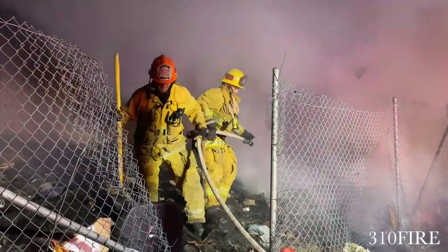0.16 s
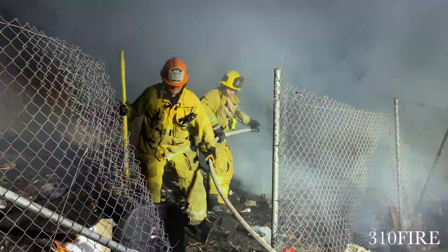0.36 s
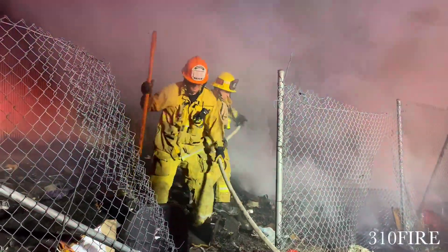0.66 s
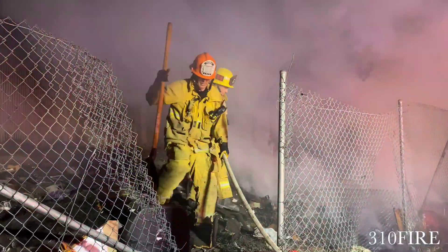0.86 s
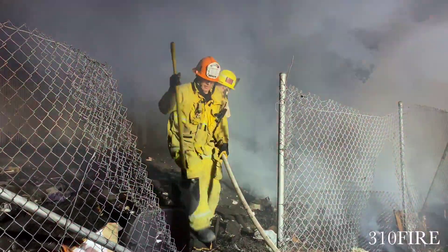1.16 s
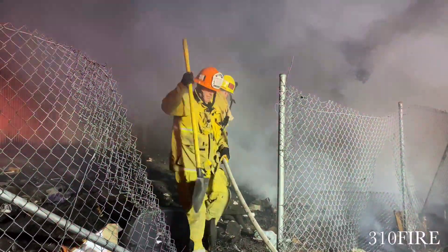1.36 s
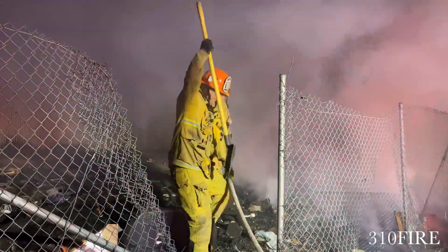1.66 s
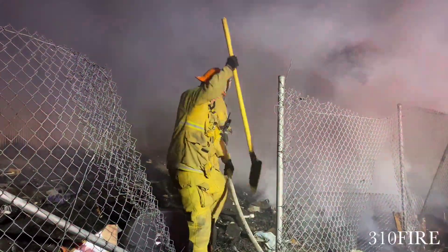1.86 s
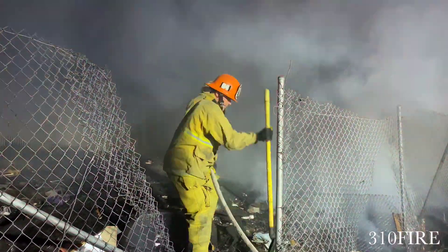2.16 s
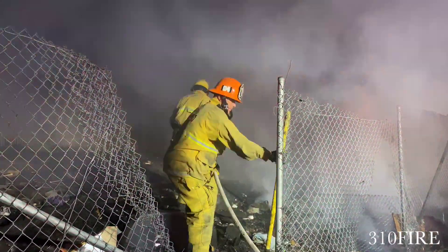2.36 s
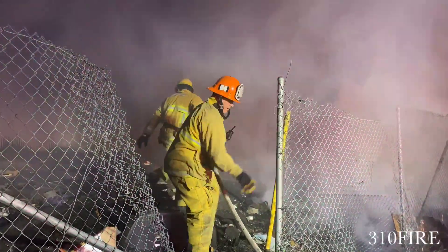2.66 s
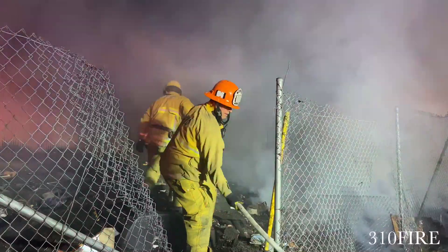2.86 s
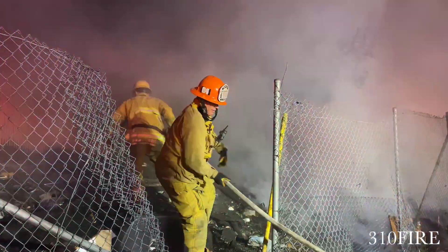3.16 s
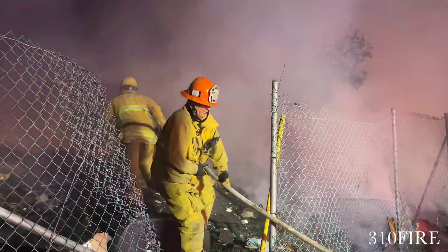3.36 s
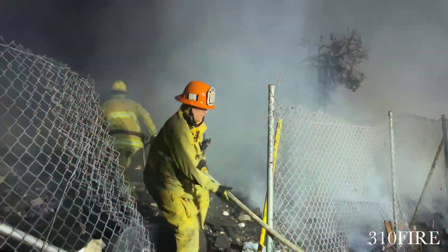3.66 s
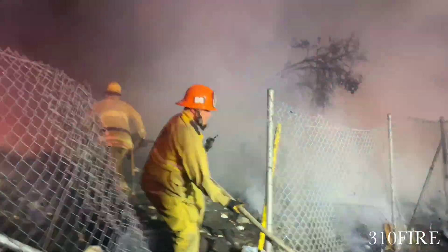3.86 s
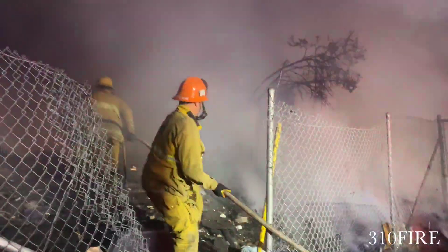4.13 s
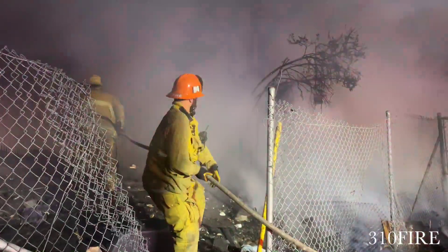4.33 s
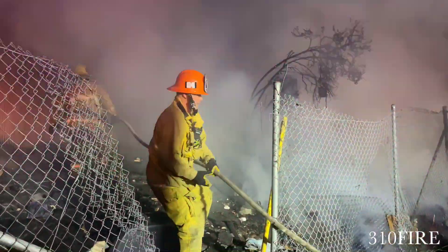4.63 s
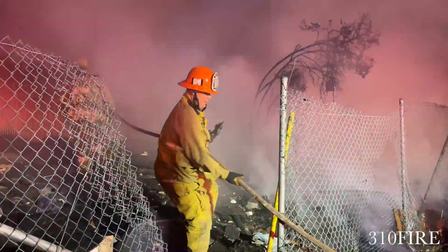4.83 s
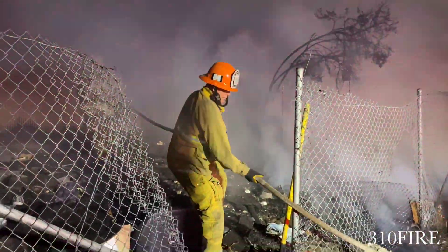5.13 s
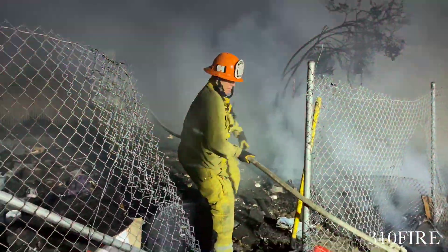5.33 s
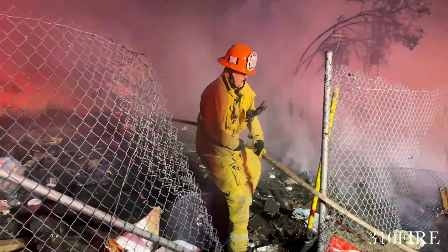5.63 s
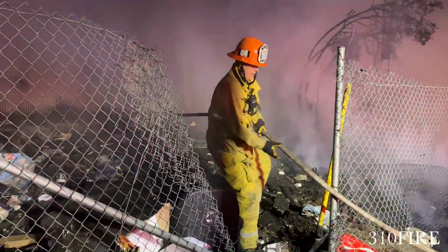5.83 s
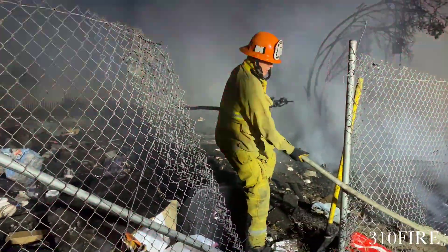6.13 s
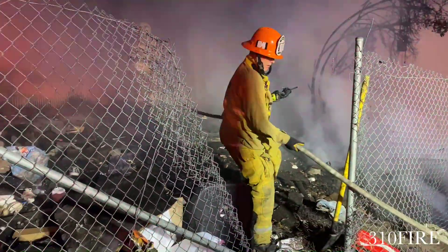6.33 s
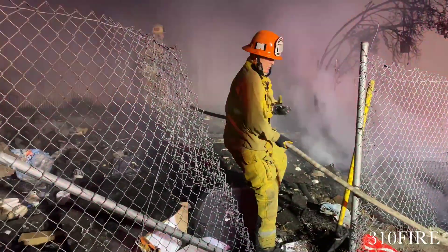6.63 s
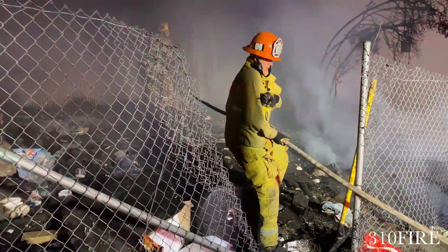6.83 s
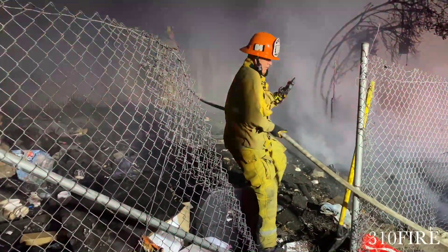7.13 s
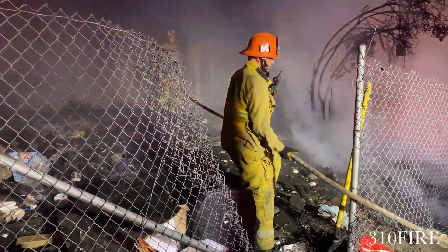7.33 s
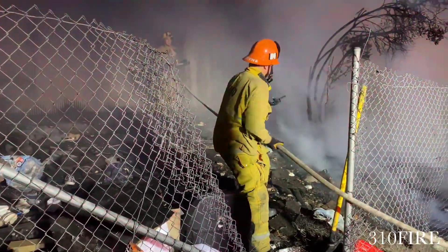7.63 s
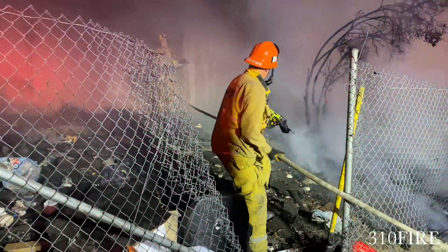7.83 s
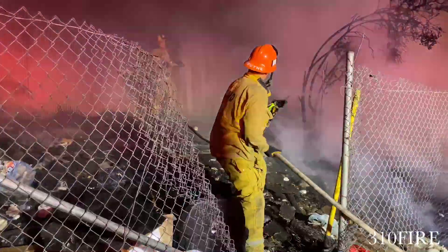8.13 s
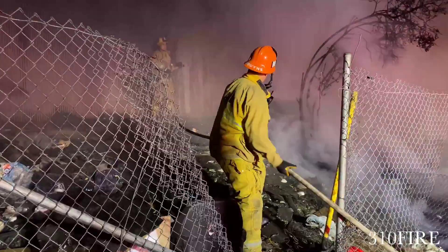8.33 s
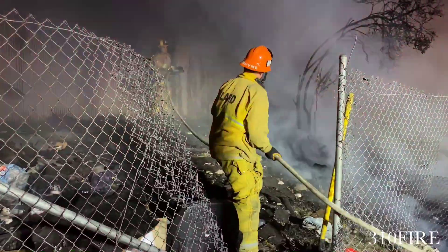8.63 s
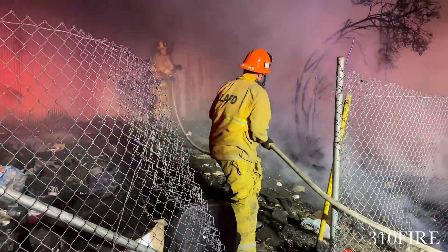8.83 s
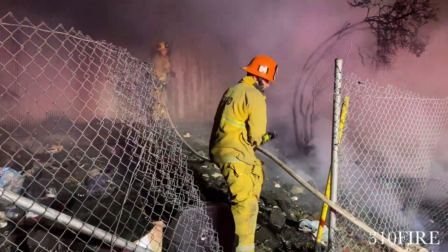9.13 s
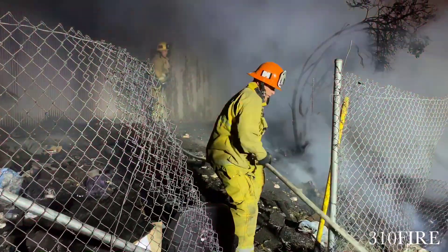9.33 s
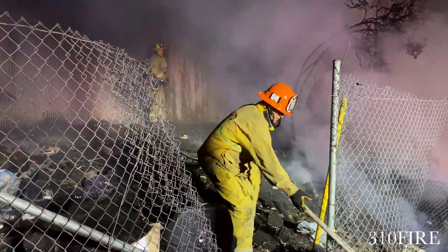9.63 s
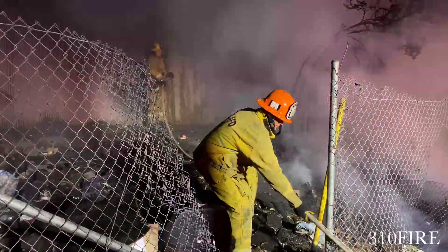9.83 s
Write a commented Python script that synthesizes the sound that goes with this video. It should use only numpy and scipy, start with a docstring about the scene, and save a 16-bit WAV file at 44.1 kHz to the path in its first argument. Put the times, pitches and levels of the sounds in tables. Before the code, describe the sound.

A fire truck's diesel engine drones while a chain-link fence jingles and ticks close by and a hose hisses farther off.

```python
"""Night, a microphone pair close to a chain-link fence. From the start a diesel pumper idles, a second
engine hunts up and down, its gears whining, and a hose sprays farther off. From 1 to 3 s a distant engine
slows and fades; just after 2 s a long tool is leaned on the mesh and scrapes down it. A hose dragging
past makes the fence jingle and tick, its links ringing most at 3 to 4 s. Toward the end the pump's
clatter and the spray grow louder."""
import sys
import numpy as np
from scipy import signal
from scipy.fft import rfft, irfft, next_fast_len
from scipy.io import wavfile
from scipy.ndimage import uniform_filter1d

SR = 44100
rng = np.random.default_rng(int(sys.argv[2]) if len(sys.argv) > 2 else 0)


def output_pcm(signal):
    """Save a mono or channel-first signal as 16-bit PCM at the path in sys.argv[1].

    Samples are clipped to [-1, 1] before scaling.
    """
    pcm = np.clip(np.atleast_2d(signal).T, -1, 1) * 32767
    wavfile.write(sys.argv[1], SR, np.round(pcm).astype(np.int16))


N = 440117
TIME = np.arange(N) / SR

# The pumper's idle. Each row: time in seconds, shaft turns a minute.
SHAFT_RPM = [(0, 839), (1.05, 830), (2, 839), (2.5, 839), (3.4, 835), (4.5, 839), (5.5, 837), (8, 840),
             (9.3, 841), (9.6, 845), (9.98, 857)]
# Exhaust tones, strongest at two pipe resonances. Each row: multiple of the shaft rate, level in dB.
EXHAUST_TONES = [(3, -39), (5, -39), (6, -39), (7, -46), (9, -45), (10, -42), (11, -38), (11.5, -41),
                 (12, -31), (13, -41), (14, -47), (15, -48), (16, -47), (17, -38), (18, -41), (18.5, -48),
                 (19, -26), (19.5, -44), (20, -28.5), (20.5, -48), (21, -40.5), (21.5, -46), (22, -47),
                 (24, -52), (27, -47), (29, -51), (30, -54)]
# Strength in dB of each of the six firings in two turns.
FIRING_DB = [1.5, -1, .6, -1.5, .3, -.6]
# The pumper at work. Each row: time in seconds, then pump clatter, hose spray and fan whirr in dB.
WORK_LEVELS = [(0, -41, -48, -40), (.5, -41.5, -46, -37.5), (1, -42.5, -46.5, -41.5),
               (2.2, -39.5, -46.5, -44.5), (3.6, -39.5, -44, -41), (4.3, -37.5, -44, -41),
               (5, -36, -42, -45), (5.8, -36, -45.5, -43.5), (6.5, -35.5, -42.5, -42),
               (6.9, -33.5, -42, -41), (7.3, -34.5, -40.5, -48), (8, -34, -39, -43),
               (8.7, -33.5, -39.5, -43), (9.98, -32.5, -38.5, -46)]
# Pump tone, lower gear whine and tool scrape. Each row: time in seconds, level in dB.
PUMP_TONE_LEVELS = [(0, -64), (2.4, -45), (3.4, -49), (4.4, -44), (6.1, -53), (6.8, -44.5), (8.8, -36),
                    (9.2, -46), (9.98, -45)]
LOWER_WHINE_LEVELS = [(0, -62), (.5, -57), (1.15, -50.5), (1.7, -55.5), (2.2, -63), (2.9, -54),
                      (3.4, -51.5), (4.1, -59), (4.7, -55.5), (5.25, -44.5), (5.6, -51), (6.1, -58),
                      (6.5, -48.5), (7.35, -48), (8.1, -57), (8.6, -48), (9.5, -49), (9.98, -53)]
SCRAPE_LEVELS = [(2.175, -57), (2.187, -28), (2.205, -31), (2.218, -25.5), (2.238, -32.5), (2.258, -37),
                 (2.272, -27), (2.305, -40), (2.345, -38), (2.4, -58)]
# Tugs on the mesh. Each row: start and hold in seconds, then jingle, overtones and rustle in dB.
MESH_TUGS = [(0, 0.15, -56, -52, -19.5), (0.216, 0.041, -53, -62, -21.5), (0.415, 0.034, -51, -57, -25),
             (0.556, .03, -55, -60, -35), (0.698, .08, -56, -57, -28), (1.53, 0.03, -57, -57, -27),
             (1.58, .025, -59, -58, -40), (1.65, .015, -58, -58, -36), (2.187, .05, -66, -50, -14),
             (2.265, 0.032, -66, -59, -40), (2.42, 0.1, -47, -52, -49), (2.74, 0.037, -53, -47, -27),
             (2.853, 0.068, -51, -48, -29), (3.02, 0.075, -42.5, -43, -21.5),
             (3.155, 0.039, -36, -31, -18.5), (3.406, 0.049, -39.5, -37, -23),
             (3.496, 0.07, -40.5, -36, -20), (3.59, 0.065, -44, -44, -22), (3.697, 0.12, -49.5, -54, -25),
             (3.856, 0.038, -40, -34, -22), (3.968, 0.035, -46, -52, -28), (4.04, 0.05, -46.5, -47, -26),
             (4.662, .02, -68, -57, -27), (5.36, .015, -64, -45, -35), (5.576, 0.08, -50, -42, -22.5),
             (7.358, 0.15, -66, -48, -32), (7.91, 0.049, -60, -56, -23), (8.055, 0.038, -62, -40, -18.5),
             (8.23, 0.046, -64, -48, -35), (8.563, .05, -64, -44, -26), (9.22, 0.083, -60, -39, -21.5),
             (9.34, 0.06, -68, -55, -36), (9.73, 0.046, -62, -56, -29), (9.895, 0.056, -56, -51, -28)]
# Faint stirring of the mesh between tugs. Each row: time in seconds, rustle in dB.
MESH_STIR = [(0, -41), (1, -35), (1.7, -28.5), (2.5, -33.5), (4.1, -36), (4.4, -35), (7.2, -45), (8.8, -34),
             (9.98, -59)]
# Ringing metal. Each row: frequency in Hz, width in Hz, relative level in dB.
CASING_MODES = [(670, 20, -1.5), (752, 16, -1.5), (803, 30, 0), (868, 30, 3.5), (912, 30, 1), (990, 45, -1),
                (1185, 12, -9), (1332, 75, 3.5), (1455, 50, -6), (1535, 40, -6), (1815, 80, -2),
                (1915, 60, -9), (2585, 60, -10), (5680, 110, -11)]
TOOL_MODES = [(1955, 40, 1), (2230, 200, 1), (2730, 110, 5), (3100, 250, 2), (3600, 150, 2), (5720, 120, 2),
              (6500, 200, -5), (7280, 150, -4)]
LINK_MODES = [(3998, 55, 7), (4055, 70, 1), (4125, 90, 0), (4200, 90, -1), (4270, 80, -4), (4340, 60, -1),
              (4430, 30, -1), (4700, 200, 0), (4920, 120, -1)]  # bunched above the note of the longest link
LINK_OVERTONES = [(11120, 70, 3), (11195, 100, 3), (11290, 120, -3), (11430, 150, -2), (11700, 300, 1),
                  (12100, 400, -2)]  # about 2.76 times higher, as in free bars
# Ticks. Each row: start in seconds, level in dB, thud over snap in dB, seconds to fall 60 dB.
FENCE_TICKS = [(.92, -38, 2, .012), (1.171, -22, -5, .01), (1.176, -38, 10, .02), (1.184, -34, -4, .012),
               (1.225, -42, 11, .04), (1.43, -43, 10, .02), (1.6335, -25.5, -2, .01), (2.348, -39, 7, .02),
               (2.751, -31, -10, .012), (3.187, -29, -8, .015), (3.404, -36, 0, .015),
               (3.6386, -33, -6, .012), (3.85, -41, -2, .012), (5.377, -34, -1, .012), (5.78, -33, 3, .012),
               (7.904, -27, -12, .025), (7.916, -26, -16, .025), (8.0641, -26, -8, .02),
               (8.073, -30, -6, .03), (8.2297, -27, -14, .02), (8.241, -27, -16, .03),
               (9.7298, -27, -8, .03), (9.742, -26, -7, .025), (9.762, -30, -3, .05), (9.893, -28, -8, .02),
               (9.9027, -28, -8, .025), (9.923, -29, -9, .06)]
# Small pieces ringing. Each row: start in seconds, level in dB, first and last Hz, length in seconds.
SMALL_CHINKS = [(4.664, -37.5, 3340, 3400, .034), (4.675, -37, 3400, 3700, .01),
                (9.066, -28.5, 990, 970, .028), (9.22, -39, 4280, 4020, .048)]
# A distant engine. Each row: time in seconds, pitch in Hz, level in dB.
PASSING_ENGINE = [(1.0, 151, -36), (1.25, 147.9, -26), (1.6, 142.2, -23.5), (2.0, 137.7, -26.5),
                  (2.4, 131.8, -30), (2.8, 125, -51)]
# Far machinery. Each row: frequency in Hz, width in Hz, level in dB.
FAR_DRONES = [(96.7, 2.54, -36), (115.2, 6, -29.5), (183.8, 2.6, -40), (375, 4, -42.5)]
# Swells of the deep rumble. Each row: middle in seconds, height in dB.
RUMBLE_SWELLS = [(.08, 8.9), (1.3, 3), (3.55, 6.7), (4.25, 6.2), (5.2, 11), (8.7, 3)]
# Colour of each noise. Each row: frequency in Hz, relative level in dB.
ROAR_SPECTRUM = [(25, -34), (34, -30), (45, -9.5), (70, -8), (115, -1), (130, -3.5), (150, -6), (200, -7.5),
                 (290, -12), (318, -14.5), (410, -15.5), (465, -18), (505, -17), (610, -24.5), (700, -20.5),
                 (780, -22), (860, -20), (1150, -32), (1600, -34.5), (3000, -38), (6000, -50)]
CLATTER_SPECTRUM = [(500, -11), (700, -7), (900, -13.5), (1100, -3), (1400, -6.5), (1600, -6.5),
                    (1900, -12), (2300, -18.5), (3000, -25)]
FAN_SPECTRUM = [(1300, -2.5), (1500, 2), (1800, 3.5), (2200, 5.5), (2600, -2), (3200, -20), (4200, -27.5)]
RUSTLE_SPECTRUM = [(1500, -16), (2500, 4), (3250, 1.5), (3700, -4), (4400, -2.5), (5500, -1.5), (8000, -10),
                   (10000, -0.5), (11500, 3.5), (12400, 7), (16000, 18)]
SCRAPE_SPECTRUM = [(1100, -38), (1900, 1), (3630, -12), (3970, -6), (7300, -10), (9260, -8), (10300, -5),
                   (12400, -31), (16100, -44), (22000, -120)]
SPRAY_SPECTRUM = [(2500, -37), (3500, 2), (4050, 6.5), (4480, 5.5), (5100, 11), (6000, 10), (7500, 5.5),
                  (8500, -8.5), (10000, -32), (12000, -56), (16000, -40)]
RUMBLE_SPECTRUM = [(28, -28), (40, 21), (58, 32), (80, -49)]
# Stereo width of the noise and fence: wide midrange, nearly centred high treble.
# Each row: frequency in Hz, left-right likeness from 0 to 1.
NOISE_LIKENESS = [(40, .96), (290, .96), (400, .8), (650, .7), (950, .3), (1500, .55), (2500, .35),
                  (3500, .1), (6000, .3), (8500, .3), (9200, .85), (9800, .5), (10500, .97), (11600, .97),
                  (12000, .6), (15000, .9)]
FENCE_LIKENESS = [(1500, 0.2), (3000, 0.16), (3600, 0.35), (4000, 0.63), (7000, 0.09), (9200, 0.79),
                  (11000, 0.76)]
# Left-right phase: the left lags, and the high treble sits mostly centred.
# Each row: frequency in Hz, phase added to the left in radians.
LEFT_PHASE = [(0, 0), (270, -1.1), (700, -2.9), (1200, -2), (2000, -3.2), (3000, -4.7), (4000, -6.5),
              (5500, -9.4), (7000, -12.3), (9200, -15.7), (10400, -18.85), (11700, -18.85), (12600, -22),
              (13700, -22), (14500, -25.1), (16000, -25.1)]
# Left-right balance. Each row: frequency in Hz, left minus right in dB.
BALANCE = [(60, -2), (110, -0.5), (200, -3), (380, -3), (700, -6), (1290, -2.5), (2380, -2.5), (4400, 1.5),
           (8120, 5.5), (15000, -3.5)]
# Close ticks also reach both sides at once. Each row: gain in dB, left first, then right.
CLOSE_TICK_DB = [
    [-8],
    [-15],
]
# The high treble is dulled. Each row: frequency in Hz, gain in dB.
TREBLE_ROLLOFF = [(8000, 0.5), (12300, -10.5), (12750, -16), (13600, -17), (13900, -23.5), (15700, -30)]


def shaft_turns():
    """Turns the idling pumper's shaft has made at each sample."""
    return np.cumsum(curves(SHAFT_RPM)[0]) / (60 * SR)


def exhaust():
    """The pumper's exhaust pulses: tones locked to the shaft, each wavering in level."""
    turns = shaft_turns()
    return np.sqrt(2) * sum(amp(db + 1.06 * wander(.024)) * np.cos(2 * np.pi * (k * turns + rng.random()))
                            for k, db in EXHAUST_TONES)


def engine_roar():
    """The diesel's steady low roar."""
    return amp(-21.5) * diffuse_noise(ROAR_SPECTRUM, patchy_db=1.75)


def pump_clatter(level_db):
    """Noise and a ringing casing swell at each of the three firings a turn."""
    firings = 3 * shaft_turns()
    strength_db = np.interp(firings % 6, np.arange(7), FIRING_DB + FIRING_DB[:1])
    beat = amp(strength_db + 3.5 * np.exp(-(firings % 1) / .3))
    casing = np.array([ring(rng.standard_normal(N), CASING_MODES) for side in range(2)])
    return amp(level_db) * unit(beat) * (diffuse_noise(CLATTER_SPECTRUM, patchy_db=2.5) + casing)


def pump_tone():
    """The pump's thin, unsteady note."""
    return amp(curves(PUMP_TONE_LEVELS)[0] + 2.5 * wander(.08)) * tone(1484.5 + 3 * wander(.05))


def fan_whirr(level_db):
    """A fan's patchy midrange rush of air."""
    return amp(level_db) * diffuse_noise(FAN_SPECTRUM, patchy_db=3.0)


def hunting_gears(cycle_s=2.11, slowest_s=1.07, rising_share=.58, centre_hz=11615, swing_hz=80):
    """Two gear whines rise and fall together as the second engine hunts."""
    hunt = np.pi * np.interp((TIME - slowest_s) / cycle_s % 1, [0, rising_share, 1], [0, 1, 2])
    upper_hz = centre_hz - swing_hz * np.cos(hunt)
    upper_db, lower_db = -49.5, curves(LOWER_WHINE_LEVELS)[0] + 1.5 * wander(.08)
    return sum(amp(db + 3.3 * wander(.0066)) * tone(ratio * (upper_hz + 8.9 * wander(.0093)))
               for ratio, db in ((1, upper_db), (.6363, lower_db)))


def hose_tugs(rise_db_per_s=1500):
    """Gains of jingle, overtones and rustle: each tug rises fast, holds and dies away, in jerks."""
    jerks = amp(2.4 * wander(.009))
    stir_offset_db = np.array([[-32], [-24], [0]])
    fall_db_per_s = np.array([[220], [220], [300]])
    gains = amp(curves(MESH_STIR)[0] + 3.8 * wander(.029) + stir_offset_db)
    for start, hold, *db in MESH_TUGS:
        at = slice(max(round((start - .1) * SR), 0), round((start + hold + .4) * SR))
        age = TIME[at] - start
        loss_db = rise_db_per_s * np.maximum(-age, 0) + fall_db_per_s * np.maximum(age - hold, 0)
        gains[:, at] += amp(np.array(db)[:, None] - loss_db)
    return gains * jerks


def fence_jingle():
    """Close by, the tugged mesh rustles and its wire links knock together, ringing like free bars."""
    jingle, overtones, rustle = hose_tugs()
    blows = knocks(per_s=2500, spread_db=1.8)
    links = ring(jingle * blows, LINK_MODES, opposed=True)
    links += ring(overtones * blows, LINK_OVERTONES, opposed=True)
    return links + rustle * unit(coloured(knocks(per_s=5000, spread_db=-.5), RUSTLE_SPECTRUM))


def tool_scrape():
    """The tool slides down the mesh in tiny slips that rasp and set it ringing."""
    slips = knocks(per_s=3500, spread_db=0)
    rings = unit(sum(amp(db) * unit(resonate(slips, hz, width)) for hz, width, db in TOOL_MODES))
    rasp = unit(coloured(slips, SCRAPE_SPECTRUM))
    return amp(curves(SCRAPE_LEVELS, outside=-120)[0]) * (.49 * rings + .65 * rasp)


def fence_ticks(snap_hz=6800, widest_hz=9000, sharpest_s=.01):
    """Fence and debris tick: a bright snap over a duller thud; longer ticks have a narrower snap."""
    ticks, grit = np.zeros(N), rng.standard_normal(N)
    thud = unit(resonate_twice(grit, hz=2500, width=2000))
    for start, db, thud_db, t60 in FENCE_TICKS:
        at = slice(round(start * SR), round((start + .04) * SR))
        width = widest_hz * sharpest_s / min(t60, 3 * sharpest_s)
        snap = unit(resonate(grit[at], snap_hz, width))
        ticks[at] += amp(db - 60 * (TIME[at] - start) / t60) * (snap + amp(thud_db) * thud[at])
    return ticks


def chinks():
    """Small pieces at the fence ring briefly, each a rough, gliding note."""
    out, rasp_hz = np.zeros(N), 80 * wander(.0007)
    for start, db, first_hz, last_hz, length in SMALL_CHINKS:
        progress = np.clip((TIME - start) / length, 0, 1)
        hz = first_hz + (last_hz - first_hz) * progress + rasp_hz
        out += amp(db) * tone(hz) * np.sin(np.pi * progress) ** 2
    return out


def hose_spray(level_db):
    """Farther off, water hisses from a hose with a slight flutter."""
    return amp(level_db + .48 * wander(.0096)) * diffuse_noise(SPRAY_SPECTRUM, patchy_db=1.5)


def passing_engine():
    """A distant engine's note sinks as it slows, cut off once it fades to its opening level."""
    hz, db = curves(PASSING_ENGINE)
    return amp(db) * tone(hz) * (db > db[0])


def far_machinery():
    """Fuzzy drones from far machines, each a narrow band of noise."""
    return sum(amp(db) * unit(resonate_twice(rng.standard_normal(N), hz, width))
               for hz, width, db in FAR_DRONES)


def deep_rumble(steady_db=-37.5, half_width_s=.2):
    """Under everything, a deep rumble that swells now and then."""
    swell_db = sum(db * np.exp(-((TIME - middle) / half_width_s) ** 2) for middle, db in RUMBLE_SWELLS)
    return amp(steady_db + swell_db) * unit(coloured(rng.standard_normal(N), RUMBLE_SPECTRUM))


def amp(db):
    """Decibels to gain."""
    return 10 ** (np.asarray(db) / 20)


def unit(x):
    """Scales to rms 1."""
    return x / np.sqrt(np.mean(x ** 2) + 1e-20)


def tone(hz):
    """A sinusoid of rms 1 that follows a pitch curve."""
    return np.sqrt(2) * np.cos(2 * np.pi * np.cumsum(hz) / SR)


def read(points, hz):
    """Reads a table on a log-frequency axis."""
    table_hz, value = np.transpose(points)
    return np.interp(np.log(hz + 1), np.log(table_hz + 1), value)


def curves(rows, outside=None):
    """One value a sample for each column after a table's times."""
    times, *columns = np.transpose(rows)
    return [np.interp(TIME, times, column, outside, outside) for column in columns]


def coloured(x, spectrum):
    """Filters by a table of dB over frequency."""
    size = next_fast_len(N)
    gain = amp(read(spectrum, np.fft.rfftfreq(size, 1 / SR)))
    return irfft(rfft(x, size) * gain, size)[..., :N]


def wander(seconds):
    """Random drift of rms 1, smoothed over the given time."""
    size = max(round(seconds * SR), 1)
    return unit(uniform_filter1d(uniform_filter1d(rng.standard_normal(N), size), size))


def resonate(x, hz, width):
    """A one-pole resonance, its width in Hz."""
    radius = np.exp(-np.pi * width / SR)
    return 2 * signal.lfilter([1 - radius], [1, -radius * np.exp(2j * np.pi * hz / SR)], x).real


def resonate_twice(x, hz, width):
    """Two passes keep a ring narrow and soften its start."""
    return resonate(resonate(x, hz, width), hz, width)


def ring(blows, modes, opposed=False):
    """Blows set modes ringing; if opposed, neighbours swing in opposite ways."""
    return sum((-1) ** (k * opposed) * amp(db) * resonate_twice(blows, hz, width) * np.sqrt(SR / width)
               for k, (hz, width, db) in enumerate(modes)) / np.sqrt(len(modes))


def diffuse_noise(spectrum, patchy_db, hop=128, size=512):
    """Two unrelated noises that share one spectrum and one field of drifting patches."""
    frames = N // hop + 5
    real, imag, patches = rng.standard_normal((frames, size // 2 + 1, 3, 2)).T.swapaxes(0, 1)
    patches = uniform_filter1d(patches[0], size=4, axis=0)  # across frequency
    patches = unit(uniform_filter1d(patches, size=16, axis=1))  # across time
    bins = (real + 1j * imag) * amp(patchy_db * patches)
    pair = signal.istft(bins, nperseg=size, noverlap=size - hop)[1][:, :N]
    return unit(coloured(pair, spectrum))


def knocks(per_s, spread_db):
    """Sparse clicks of random sign, their sizes scattered by spread_db."""
    chance, size, sign = rng.random((N, 3)).T
    return unit((chance < per_s / SR) * amp(-spread_db * np.log(size + .048)) * np.sign(sign - .5))


def stereo(direct, left_only=None, likeness=None):
    """Sets a sound's left-right phase and balance; low likeness blends another into the left."""
    size = next_fast_len(N)
    hz = np.fft.rfftfreq(size, 1 / SR)
    left = right = rfft(direct, size)
    if likeness is not None:
        shared = read(likeness, hz)
        left = shared * right + np.sqrt(1 - shared ** 2) * rfft(left_only, size)
    phase = np.exp(1j * np.interp(hz, *np.transpose(LEFT_PHASE)))
    tilt = amp(read(BALANCE, hz) / 2)
    return irfft([left * phase * tilt, right / tilt], size)[:, :N]


def scene():
    """Focused engine tones, wider noise, and the close fence scattering off rubble."""
    clatter_db, spray_db, whirr_db = curves(WORK_LEVELS)
    fence = fence_jingle() + tool_scrape()
    ticks = fence_ticks()
    fence += chinks()
    rubble_echo = rng.standard_normal(1200) * amp(-.025 * np.arange(1200))
    scattered = signal.oaconvolve(fence, rubble_echo / np.linalg.norm(rubble_echo))[:N]
    close = stereo(fence + ticks, scattered, FENCE_LIKENESS) + amp(CLOSE_TICK_DB) * ticks
    diffuse = pump_clatter(clatter_db) + engine_roar() + fan_whirr(whirr_db) + hose_spray(spray_db)
    engines = exhaust() + hunting_gears() + passing_engine() + far_machinery() + pump_tone()
    return close + stereo(*diffuse, NOISE_LIKENESS) + stereo(engines + deep_rumble())


def record(dry):
    """The high treble is dulled, with little above 15.8 kHz."""
    low_pass = signal.firwin(511, 15830, window=("kaiser", 9), fs=SR)
    return signal.oaconvolve(coloured(dry, TREBLE_ROLLOFF), low_pass[None], "same")


dry = scene()
out = record(dry)
output_pcm(out)
```